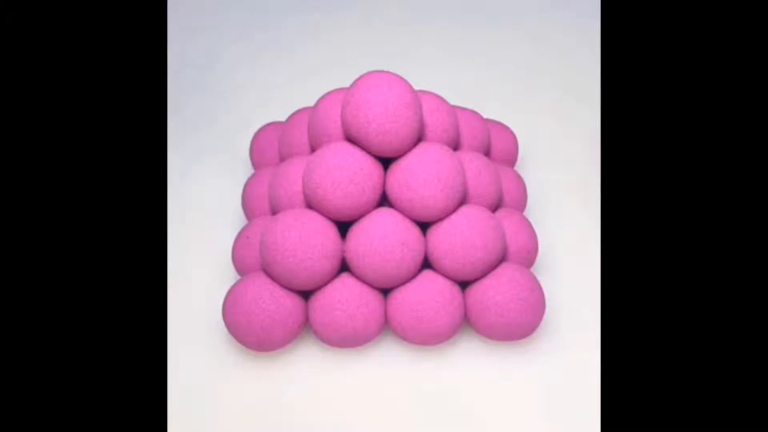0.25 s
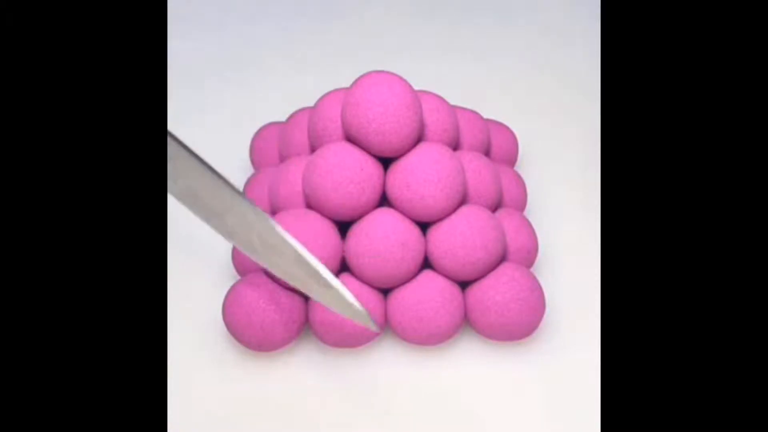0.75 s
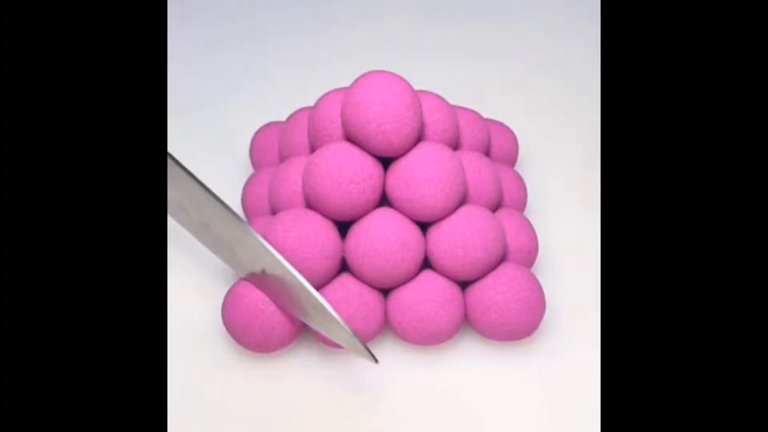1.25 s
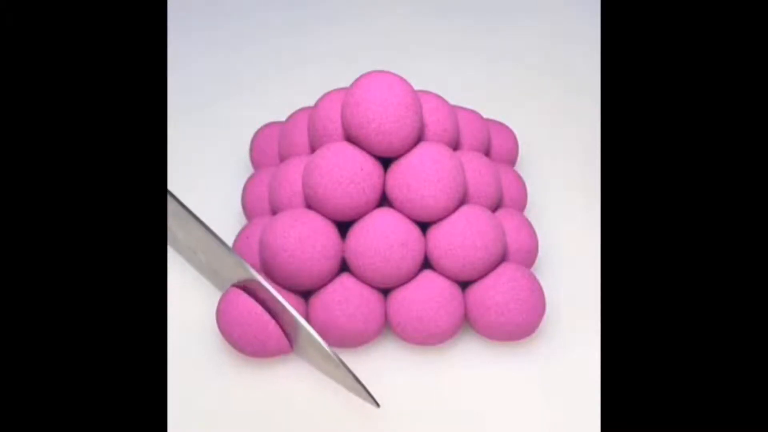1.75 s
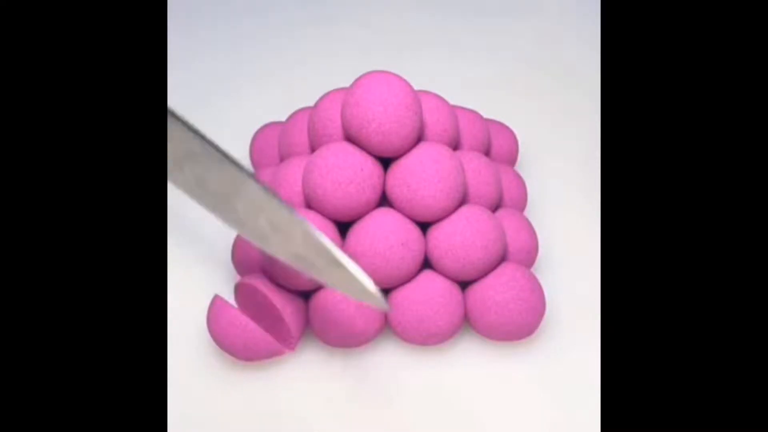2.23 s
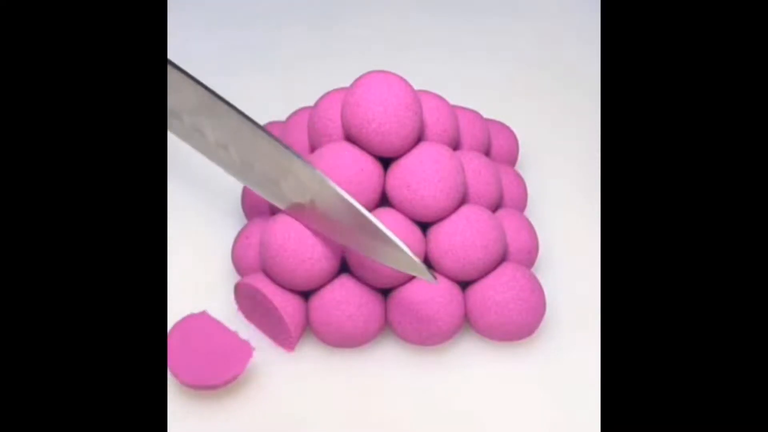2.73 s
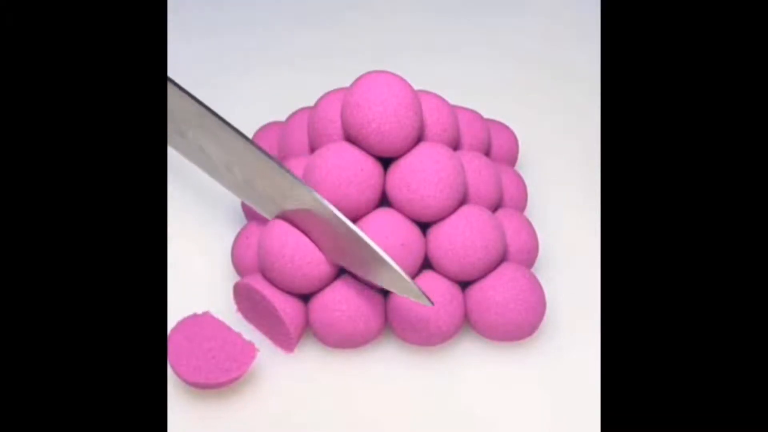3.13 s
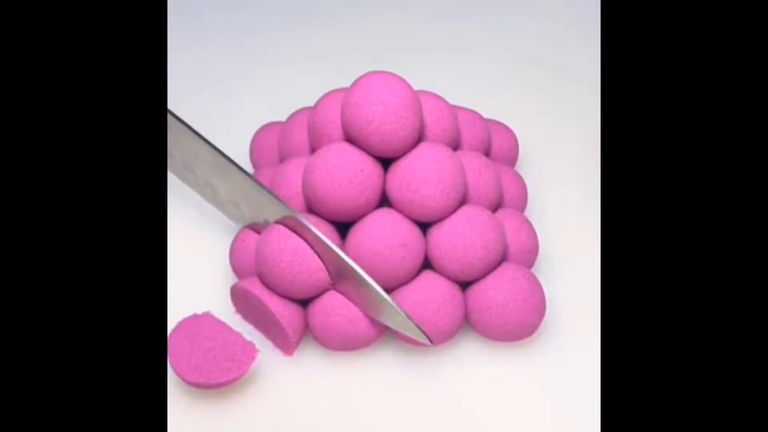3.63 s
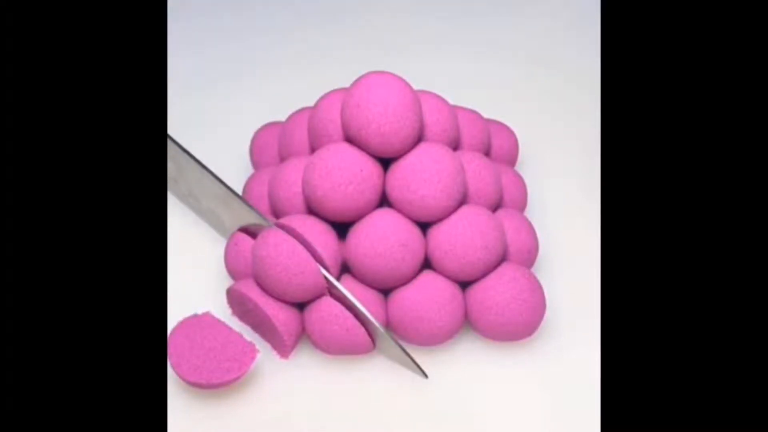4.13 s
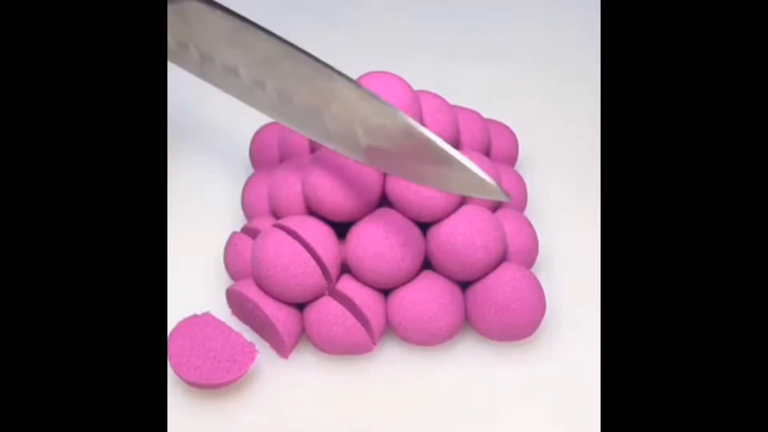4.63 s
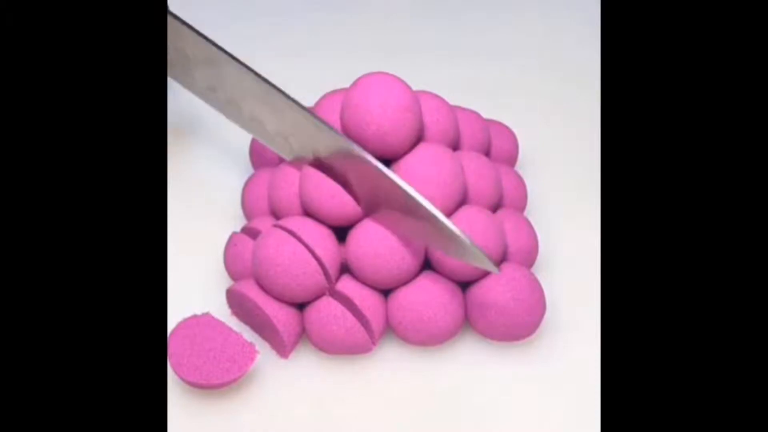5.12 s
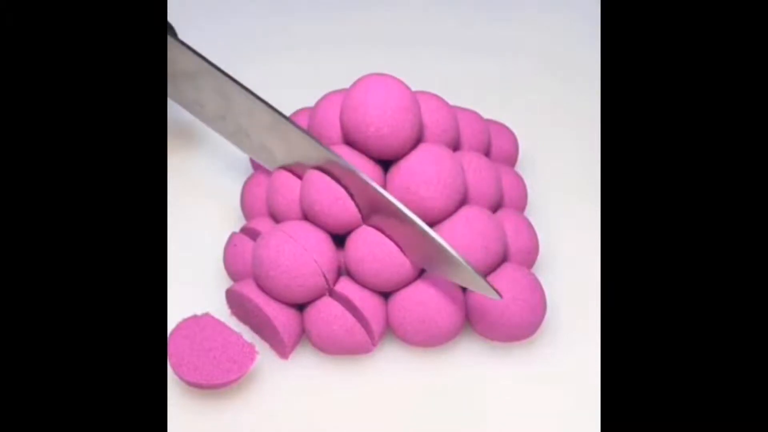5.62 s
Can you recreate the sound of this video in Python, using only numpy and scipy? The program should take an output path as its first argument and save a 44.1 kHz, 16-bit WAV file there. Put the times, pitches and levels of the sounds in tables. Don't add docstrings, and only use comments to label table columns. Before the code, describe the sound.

Close-up gritty crunching and scraping as a blade presses through packed sand in several strokes, with dull table knocks and brief dull metallic rings.

```python
import sys
import numpy as np
from scipy import signal
from scipy.fft import rfft, irfft, next_fast_len
from scipy.io import wavfile
from scipy.ndimage import uniform_filter1d

SR = 44100
rng = np.random.default_rng(int(sys.argv[2]) if len(sys.argv) > 2 else 0)


def linear_from_db(decibels):
    return 10 ** (np.asarray(decibels, float) / 20)


def bounce(signal):
    frames = np.transpose(np.atleast_2d(signal))
    limited = np.clip(frames, -1, 1)
    pcm = np.round(limited * 32767).astype(np.int16)
    wavfile.write(sys.argv[1], SR, pcm)


N = 258867

# frequency in Hz, level in dB per Hz.
ROOM_SPECTRUM = [(3, 1), (9, 2.5), (18, -3.5), (40, -9.5), (66, -18.5), (87, -33), (125, -28.5), (250, -32),
                 (400, -37.5), (680, -40.5), (1700, -45.5), (5000, -49.5), (12000, -51.5), (14000, -88)]
# frequency in Hz, level in dB.
MOTOR_HUM = [(59.2, -58), (120, -73), (242, -80), (570, -86)]
# time in seconds, level in dB.
TABLE_LEAN = [(0, -5.5), (.31, -11), (.6, -6), (1.3, 1.5), (2.6, 1.5), (3.0, -2.5), (3.4, 1), (3.7, 1.5),
              (4.9, 1), (5.4, -0.5), (5.87, -5)]
# start in seconds, peak in dB, frequency in Hz, t60 in seconds.
STRUCK_MODES = [(0.003, -52.5, 2180, 0.0066), (0.003, -61, 1430, 0.03), (0.209, -69, 2270, .03),
                (0.21, -58, 1800, .03), (1.096, -41.5, 667, 0.098), (1.096, -35.5, 1370, 0.023),
                (1.096, -49.5, 1203, 0.1), (1.099, -51, 2100, 0.09), (1.977, -32, 1235, 0.023),
                (1.977, -34, 652, 0.052), (2.782, -48.5, 673, 0.1), (2.782, -45.5, 1370, 0.027),
                (2.814, -46.5, 1370, 0.051), (4.011, -40, 433, 0.11), (4.836, -41.5, 660, 0.046),
                (4.837, -51.5, 1850, 0.047), (4.839, -61, 1370, .15)]
# start in seconds, peak in dB, frequency in Hz, rise in seconds, roughness 0-1.
RUBBED_MODES = [
    (0.222, -62, 1028, 0.053, 0.65),
    (1.9, -59, 1370, 0.038, .45),
    (2.25, -59, 673, .012, .4),
    (4.33, -57.5, 673, 0.016, 0.5),
    (4.372, -47, 673, 0.031, 0.48),
    (4.379, -54, 1206, .045, 0.4),
    (4.385, -47.5, 1370, 0.045, 0.5),
    (4.4, -61, 1830, 0.027, 0.36),
    (4.418, -37.5, 673, 0.021, 0.1),
    (5.69, -35, 96.5, 0.054, 0.35),
]
# start in seconds, peak in dB, table pitch in Hz, t60 in seconds, knock in dB re the push.
LANDINGS = [(.005, -42, 128, 0.11, -7.5), (0.213, -40.5, 144, 0.035, -32), (1.095, -29.5, 66, 0.096, -3.5),
            (1.965, -22.5, 63.3, 0.098, 4.5), (1.977, -21, 102, 0.036, 1), (2.002, -45, 118, 0.08, 4),
            (2.783, -31.5, 74, 0.14, -6.5), (3.398, -33, 120, 0.071, 1), (4.0095, -24, 175, 0.039, 2.5),
            (4.836, -25, 77.4, 0.11, -21), (5.268, -21.5, 83.6, 0.071, -10)]
# time in seconds, pressure on the edge as grit in dB, depth in the sand 0-1.
SLICES = [
    [(1.2, -75, 0.3), (1.258, -63, .2), (1.3, -59.5, 0.27), (1.346, -51, 0.32), (1.598, -47.5, 0.41),
     (1.942, -54, 0.55), (1.96, -39.5, 0.58), (1.99, -63.5, .9), (2.06, -74, .9)],
    [(2.92, -66, .5), (2.956, -59.5, 0.37), (3.132, -48.5, 0.38), (3.208, -47, 0.39), (3.394, -42.5, 0.31),
     (3.436, -52.5, 0.57), (3.542, -56, .5)],
    [(3.542, -59, 0.44), (3.6, -50.5, 0.43), (3.838, -43.5, 0.54), (3.892, -45, 0.6), (3.988, -48, 0.8),
     (4.014, -45.5, 0.96), (4.022, -65, 0.96), (4.05, -71, 1)],
    [(5.0, -66, 0.33), (5.046, -70, 0.2), (5.054, -61, 0.4), (5.128, -48.5, 0.54), (5.26, -38.5, 0.36),
     (5.294, -49, .2), (5.302, -54.5, 0.5), (5.354, -57, 0.38), (5.4, -59, 0.26)],
    [(5.4, -60, 0.52), (5.474, -57.5, 0.4), (5.534, -53.5, 0.34), (5.656, -45, 0.5), (5.782, -39.5, 0.36),
     (5.842, -51, 0.53), (5.87, -49.5, 0.66)],
]
SLICE_WEIGHT_DB = [3, 0.7, 1.5, -2, 0]
# start in seconds, length in seconds, grit in dB at start, grit in dB at end, bending in dB re grit.
LIGHT_BRUSHES = [(1.093, 0.024, -41.5, -62, -19), (1.114, 0.098, -62.5, -82, 0),
                 (1.958, 0.033, -44.5, -63.5, 14.5), (2.229, 0.031, -73, -62.5, 2),
                 (2.256, 0.024, -58.5, -80, 3), (2.776, 0.05, -73, -58.5, 6), (2.827, .09, -60, -70, 1.5),
                 (4.305, .027, -63.5, -52.5, -11), (4.334, 0.014, -55, -59, -10),
                 (4.361, 0.073, -53, -50.5, -10.5), (4.434, 0.026, -50.5, -87, 1),
                 (4.828, 0.1, -64, -76, -4)]
# start in seconds, peak in dB, bending in dB re peak.
EDGE_SLIPS = [(0.2084, -72, 3), (1.094, -33, -40), (1.1652, -51, 3), (1.2371, -50, -37), (1.261, -41, -30),
              (1.3105, -31.5, -12), (1.963, -36, 3), (1.976, -38.5, 3), (2.0514, -67, 1), (2.137, -58, -2),
              (2.227, -50.5, -8), (2.2523, -50, -12), (2.782, -42, -7.5), (2.811, -41.5, -11),
              (2.9432, -42.5, -1), (3.0342, -37.5, -2), (3.4064, -36, -16), (4.008, -40, 16),
              (4.369, -52, -16.5), (4.834, -47, -12), (5.002, -43.5, -3.5), (5.0492, -42, -20),
              (5.078, -39.5, -18), (5.1176, -35.5, 1), (5.2877, -28.5, -9), (5.4107, -41, -22),
              (5.423, -40.5, -10)]
# frequency in Hz, level in dB per Hz.
GRAIN_RASP = [(290, -4.5), (500, -20.5), (944, -15), (2090, -9), (2480, -24.5), (3270, -10), (4970, -6.5),
              (5540, -1), (6430, -9), (7170, -3), (11000, -3.5), (12100, -9.5), (12600, -82), (16400, -112),
              (22000, -120)]
# frequency in Hz, level in dB per Hz.
TABLE_CRUSH = [(24, -35), (40, 4.5), (65, 2.5), (179, 0.5), (241, -9), (434, -10), (571, -15), (700, -33),
               (910, -76), (1540, -120)]
# frequency in Hz, width in Hz, level in dB.
HELD_MODES = [(628, 9.6, -2), (948, 83, 1), (1191.3, 36.7, 4), (1830, 22, 0.5), (2086, 43, -7)]
# frequency in Hz, width in Hz, level in dB.
EDGE_MODES = [(3210, 113, -12), (4495, 48, 3), (5530, 45, -10), (5930, 50, -3), (7120, 74, -3),
              (7170, 140, -20.5), (7940, 190, -6), (8330, 230, -19), (9000, 25, -17), (9410, 325, 4),
              (10600, 17, -51), (10790, 146, 4.5), (10980, 90, -3.5), (10923, 76, 6)]
# frequency in Hz, width in Hz, level in dB.
LOOSE_MODES = [(673, 22, -2), (1238, 78, 2.5), (1370, 380, -10.5), (1960, 45, -14)]
# frequency in Hz, level in dB.
STEREO_WIDTH = [(3600, -72), (4300, -16.5), (5200, -11), (8000, -2), (11000, -9), (12500, -7)]
# start in seconds, end in seconds.
OPEN_TOP = [
    (1.06, 1.16),
    (1.29, 1.46),
    (1.89, 2.04),
    (2.73, 2.83),
    (4.27, 4.37),
    (5.38, 5.46),
]
# start in seconds, end in seconds, lower edge in Hz.
TREBLE_GAPS = [
    (1.082, 1.09, 4000),
    (4.022, 4.028, 5500),
    (4.826, 4.832, 6000),
]


def evened(x):
    return x / np.sqrt(np.mean(x ** 2) + 1e-20)


def coloured(x, points):
    size = next_fast_len(len(x))
    f, db = np.transpose(points)
    hz = np.fft.rfftfreq(size, 1 / SR)
    gain = linear_from_db(np.interp(np.log(hz + 1), np.log(f + 1), db))
    return irfft(rfft(x, size) * gain, size)[:len(x)]


def wander(per_s):
    pole = np.exp(-2 * np.pi * per_s / SR)
    return evened(signal.lfilter([1], [1, -pole], rng.standard_normal(N)))


def add(mix, s, sound):
    part = mix[round(s * SR):][:len(sound)]
    part += sound[:len(part)]


def room():
    hiss_db, rumble_db, hum_db = -68, -52, 4
    rumble_follows = 0.11
    t = np.arange(N) / SR
    tone = evened(coloured(rng.standard_normal(N), ROOM_SPECTRUM))
    low = signal.sosfiltfilt(signal.butter(3, 75, fs=SR, output="sos"), tone)
    lean_db = np.interp(t, *np.transpose(TABLE_LEAN))
    hum = np.zeros(N)
    for hz, db in MOTOR_HUM:
        hum += linear_from_db(db + 1.2 * wander(2.5)) * np.sin(2 * np.pi * hz * t + 0.6 * wander(4))
    hiss = evened(tone - low) * linear_from_db(hiss_db + 0.34 * wander(5.0))
    rumble = evened(low) * linear_from_db(rumble_db + rumble_follows * lean_db)
    return hiss + rumble + hum * linear_from_db(hum_db + lean_db)


def rings():
    struck_rise_s, struck_rough, rubbed_t60_s = 0.0015, 0.15, 0.11
    out = np.zeros(N)
    t = np.arange(SR // 6) / SR
    shake = wander(60) + 1j * wander(60)
    struck = [(s, db, hz, struck_rise_s, t60, struck_rough) for s, db, hz, t60 in STRUCK_MODES]
    rubbed = [(s, db, hz, rise, rubbed_t60_s, rough) for s, db, hz, rise, rough in RUBBED_MODES]
    for s, db, hz, rise, t60, rough in struck + rubbed:
        swell = np.minimum(t / rise, 1) * linear_from_db(db - 60 * np.maximum(t - rise, 0) / t60)
        uneven = 1 - rough + 0.7 * rough * shake[round(s * SR):][:len(t)]
        add(out, s, swell * (uneven * np.exp(2j * np.pi * hz * t)).imag)
    return out


def thuds():
    knock_over_table = 2.14
    out = np.zeros(N)
    t = np.arange(SR // 4) / SR
    for s, db, hz, t60, knock_db in LANDINGS:
        push = np.sin(2 * np.pi * hz * t) * linear_from_db(-60 * t / t60)
        knock = np.sin(2 * np.pi * knock_over_table * hz * t) * linear_from_db(knock_db - 60 * t / (0.48 * t60))
        add(out, s, linear_from_db(db - 2.5) * (push + knock))
    return out


def press_slices(power, shares):
    bend_top_db, bend_deep_db = -8, 1.5
    crush_top_db, crush_deep_db = -5.5, 3.5
    free_at_top = 0.39
    t = np.arange(N) / SR
    for rows, weight_db in zip(SLICES, SLICE_WEIGHT_DB):
        s, grit_db, depth = np.transpose(rows)
        on = (t >= s[0]) & (t < s[-1])
        db = np.interp(t[on], s, grit_db)
        deep = np.clip(np.interp(t[on], s, depth), 0, 1)
        bend_db = bend_top_db + (bend_deep_db - bend_top_db) * deep
        crush_db = weight_db + crush_top_db + (crush_deep_db - crush_top_db) * deep
        power[:, on] = linear_from_db(np.array([db, db + bend_db, db + crush_db])) ** 2
        shares[:, on] = [free_at_top * (1 - deep), deep]


def brush_sand(power):
    edge_s, crush_db = 0.0013, -2.5
    for s, length, start_db, end_db, bend_db in LIGHT_BRUSHES:
        u = np.arange(0, length, 1 / SR)
        stroke = np.minimum(u / edge_s, 1) * linear_from_db(start_db + (end_db - start_db) * u / length)
        for k, db in enumerate([0, bend_db, crush_db]):
            add(power[k], s, (linear_from_db(db) * stroke) ** 2)


def slip_edge(power):
    rise_s, t60_s = 0.0012, 0.023
    u = np.arange(SR // 8) / SR
    burst = np.minimum(u / rise_s, 1) * linear_from_db(-60 * u / t60_s)
    for s, db, bend_db in EDGE_SLIPS:
        add(power[0], s, (linear_from_db(db - 4) * burst) ** 2)
        add(power[1], s, (linear_from_db(db + min(bend_db, 3) - 4) * burst) ** 2)


def settle_crumbs(power):
    settle_db, t60_s = -21.5, 0.25
    t, u = np.arange(N) / SR, np.arange(SR // 8) / SR
    for s, db, *_ in LANDINGS:
        add(power[2], s, linear_from_db(db + settle_db - 60 * u / t60_s) ** 2)
        power[2] *= np.clip(abs(t - s - 0.008) / 0.015 - 0.6, 0.1, 1)


def efforts():
    power = np.zeros((3, N))
    shares = np.outer([0.7, 0.37], np.ones(N))
    press_slices(power, shares)
    brush_sand(power)
    slip_edge(power)
    settle_crumbs(power)
    return *np.sqrt(power), *np.clip(shares, 0, 1)


def grains(per_s, spread_db, clump_db, snap_per_s, snap_db):
    size = linear_from_db(spread_db * np.minimum(rng.exponential(1, N), 5)) * rng.choice([-1., 1.], N)
    jerk = wander(30) + 0.75 * wander(150)
    jerk = jerk - uniform_filter1d(jerk, size=6000)
    clods = rng.random(N) * (rng.random(N) < snap_per_s / SR)
    snaps = signal.lfilter([1], [1, -np.exp(-1 / (0.00059 * SR))], clods)
    clumps = linear_from_db(clump_db * jerk) * (1 + linear_from_db(snap_db) * snaps)
    return evened(size * (rng.random(N) < per_s / SR) * clumps)


def rasp(slips, grit, bend, free, damped):
    sand = evened(coloured(slips, GRAIN_RASP))
    high = signal.sosfiltfilt(signal.butter(2, 2500, "highpass", fs=SR, output="sos"), sand)
    low = evened(sand - high)
    dull = np.sqrt(damped) * (grit * evened(high) + bend * np.sqrt(1 - free) * low)
    crunch_band = signal.butter(2, [2100, 3400], "bandpass", fs=SR, output="sos")
    crunch = evened(signal.sosfilt(crunch_band, slips))
    return dull + linear_from_db(-6.0) * damped ** 2.0 * grit * crunch


def ring(x, modes, flicker_db):
    out = np.zeros(len(x))
    for k, (hz, width, db) in enumerate(modes):
        r = np.exp(-np.pi * width / SR)
        drive = x * linear_from_db(db + flicker_db * wander(15.5))
        turning = signal.lfilter([1 - r], [1, -r * np.exp(2j * np.pi * hz / SR)], drive)
        out += (-1) ** k * 2 * turning.real
    return evened(out)


def blade(slips, grit, bend, free, damped):
    drives = [(EDGE_MODES, grit * np.sqrt(1 - damped)),
              (HELD_MODES, bend * np.sqrt((1 - free) * (1 - damped))),
              (LOOSE_MODES, bend * np.sqrt(free))]
    out = np.zeros(N)
    for modes, drive in drives:
        out += ring(drive * slips, modes, 1.76) * np.sqrt(np.mean(drive ** 2))
    return out


def crushed_sand(crush):
    return linear_from_db(-1.5) * crush * evened(coloured(grains(1500, 2.5, 1.0, 35, 2.6), TABLE_CRUSH))


def knife():
    grit, bend, crush, free, damped = efforts()
    slips = grains(9000, 2.58, 1.01, 70, 5.5)
    steel = blade(slips, grit, bend, free, damped)
    return rasp(slips, grit, bend, free, damped) + steel + crushed_sand(crush)


def scene():
    mid = room() + rings() + thuds() + knife()
    return np.array([mid, mid])


def top_cut(x):
    return signal.sosfilt(signal.butter(12, 12790, fs=SR, output="sos"), x)


def record(dry):
    top_hz, top_step_hz, top_hold_s, open_hz = 11800, 170, 0.07, 650
    hz, t, z = signal.stft(dry[0], SR, nperseg=512)
    top = top_hz + top_step_hz * rng.standard_normal(len(t))[(t / top_hold_s).astype(int)]
    top += open_hz * sum((t >= start) & (t < end) for start, end in OPEN_TOP)
    z = z * np.clip((top - 60 - hz[:, None]) / 120, 0, 1)
    wobble = uniform_filter1d(rng.standard_normal(z.shape), size=7, axis=0)
    wobble = evened(uniform_filter1d(wobble, size=9, axis=1))
    z = z * linear_from_db(1.23 * wobble)
    patches = evened(uniform_filter1d(rng.standard_normal((33, len(t) // 12 + 1)), size=3, axis=0))
    parted = np.kron(patches > 0.25, np.ones((8, 12)))[:len(hz), :len(t)] * (hz[:, None] > 4100)
    parted = uniform_filter1d(parted, size=4, axis=1)
    mid = signal.istft(z * (1 - 0.22 * parted), SR, nperseg=512)[1][:N]
    scattered = z * parted * np.exp(2j * np.pi * rng.random(z.shape))
    side = signal.istft(scattered, SR, nperseg=512)[1][:N]
    pair = np.array([mid, mid]) + np.outer([1, -1], coloured(side, STEREO_WIDTH))
    for start, end, above_hz in TREBLE_GAPS:
        treble = signal.sosfiltfilt(signal.butter(8, above_hz, "highpass", fs=SR, output="sos"), pair)
        inside = abs(np.arange(N) / SR - (start + end) / 2) < (end - start) / 2
        pair = pair - uniform_filter1d(1. * inside, size=90) * treble
    return top_cut(pair)


dry = scene()
out = record(dry)
bounce(out)
```